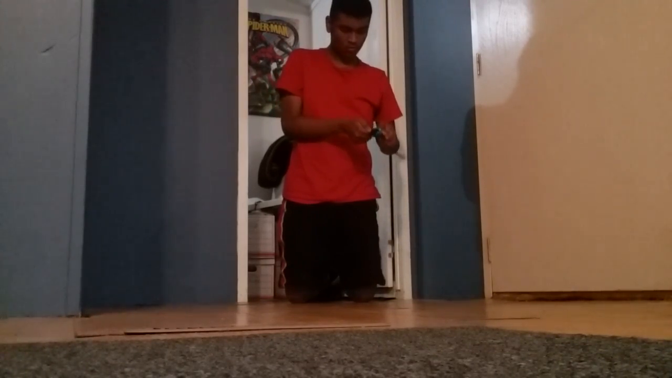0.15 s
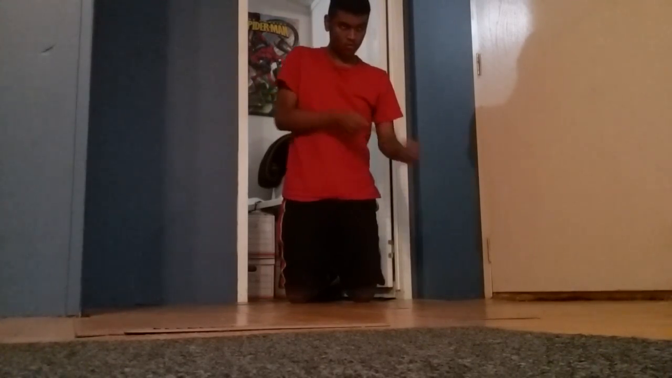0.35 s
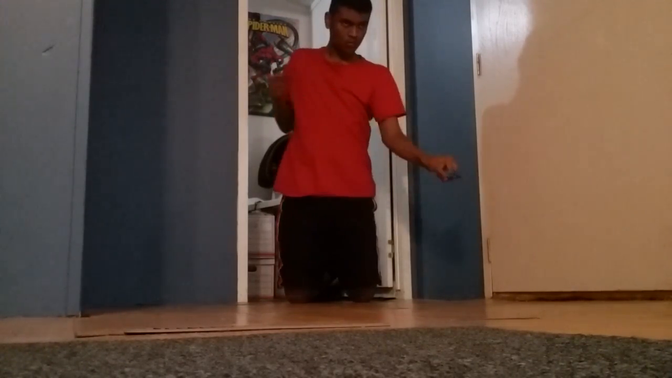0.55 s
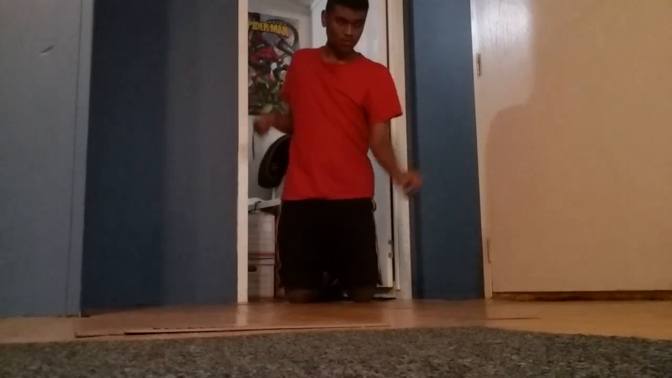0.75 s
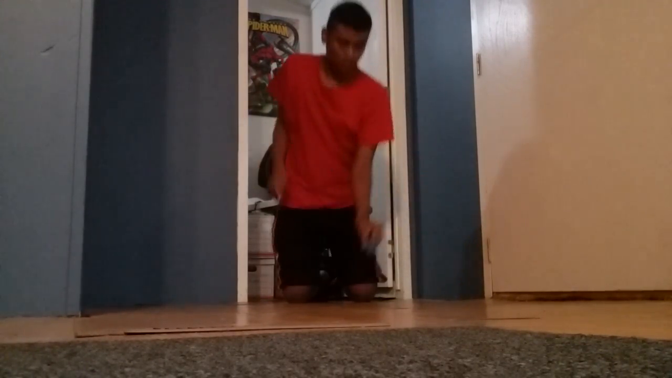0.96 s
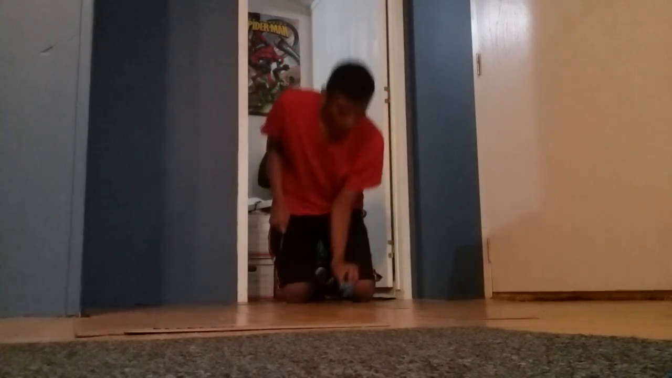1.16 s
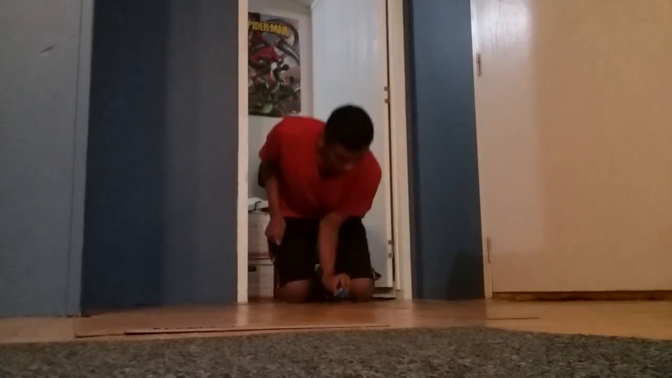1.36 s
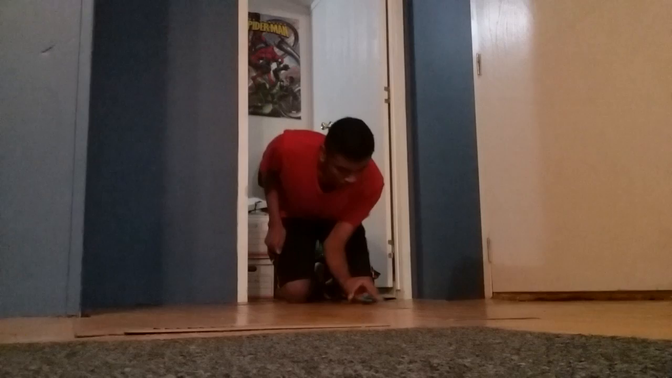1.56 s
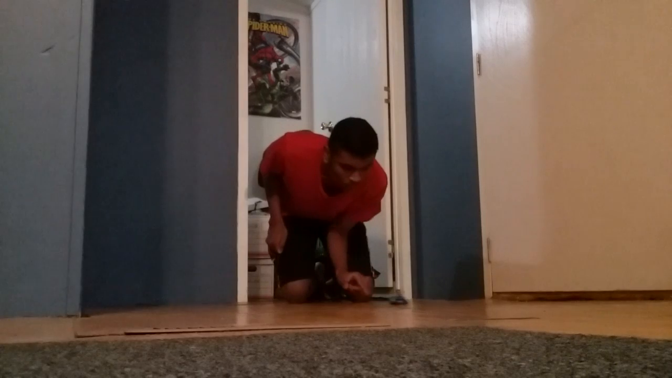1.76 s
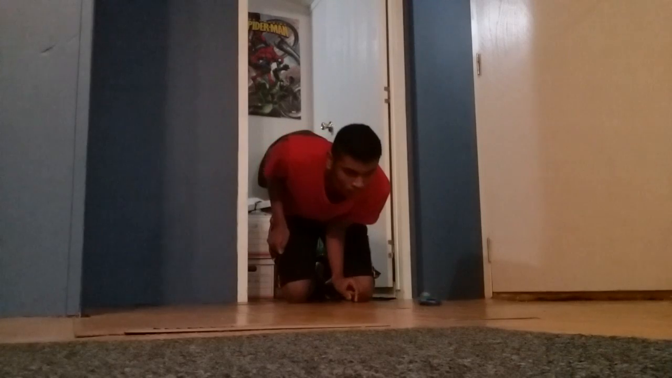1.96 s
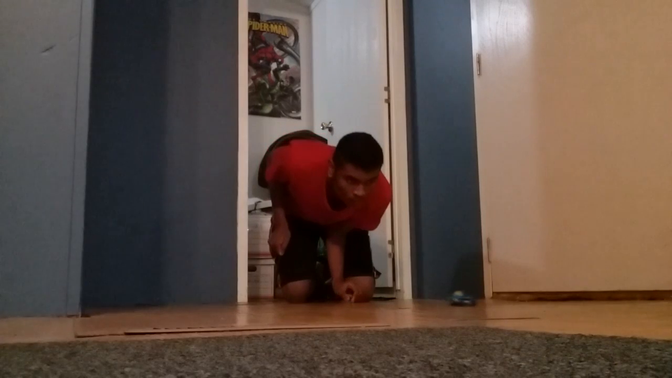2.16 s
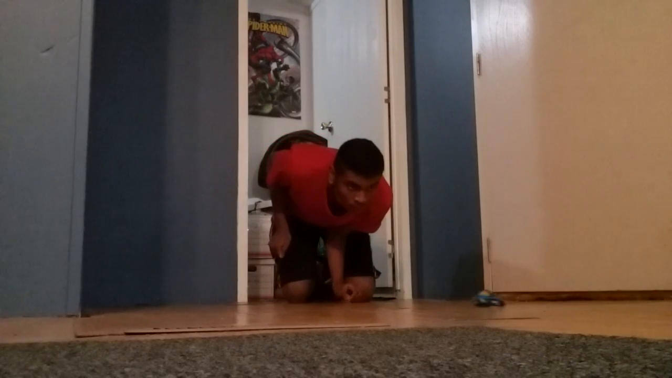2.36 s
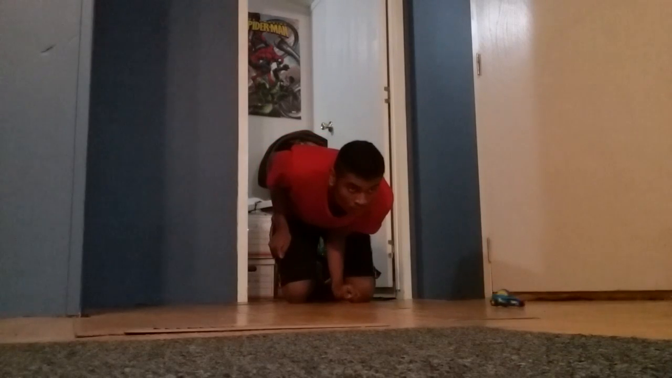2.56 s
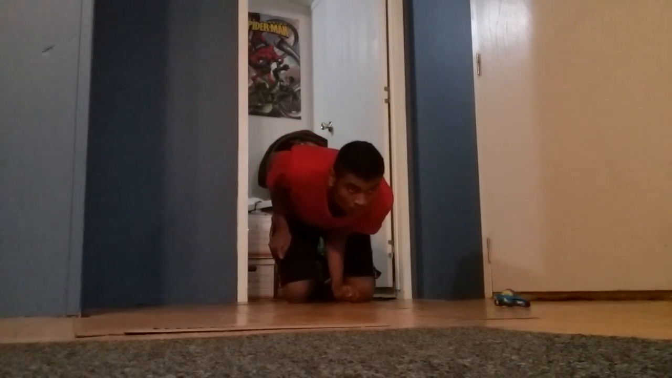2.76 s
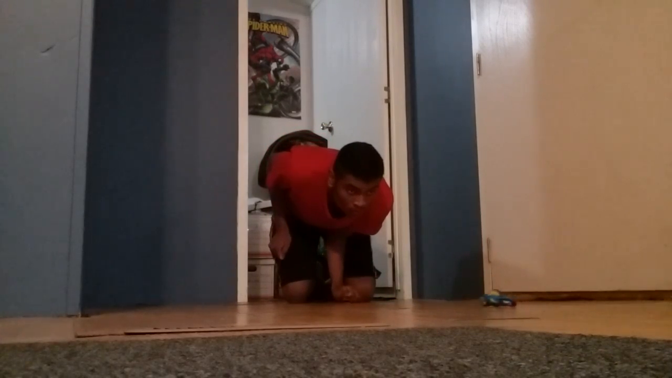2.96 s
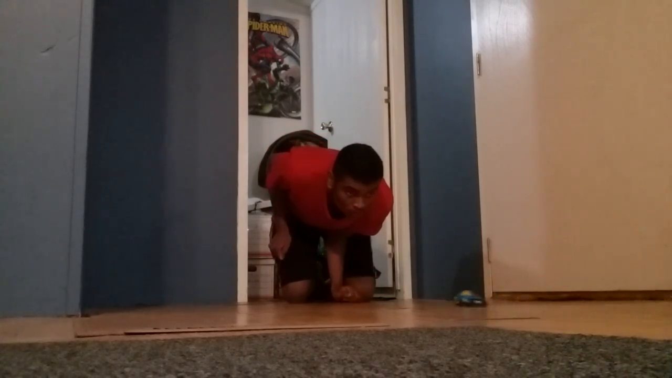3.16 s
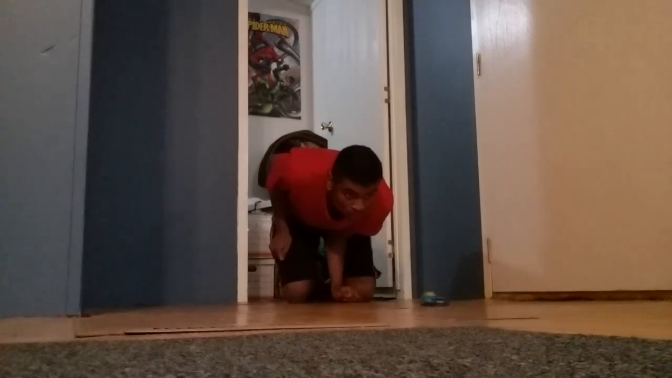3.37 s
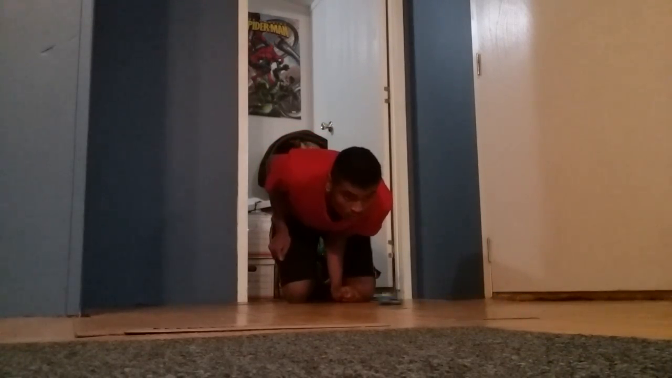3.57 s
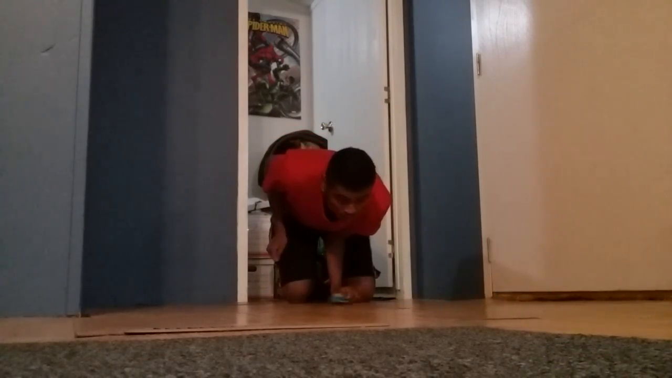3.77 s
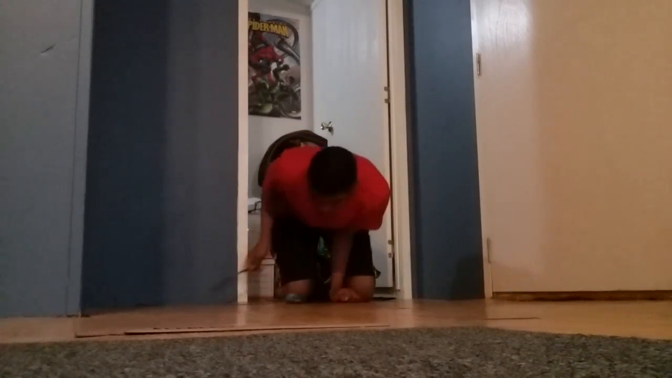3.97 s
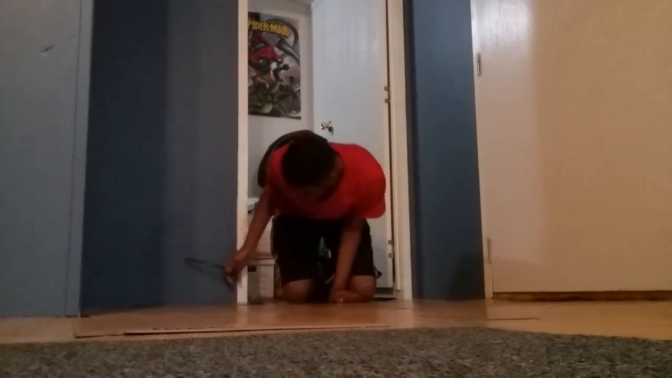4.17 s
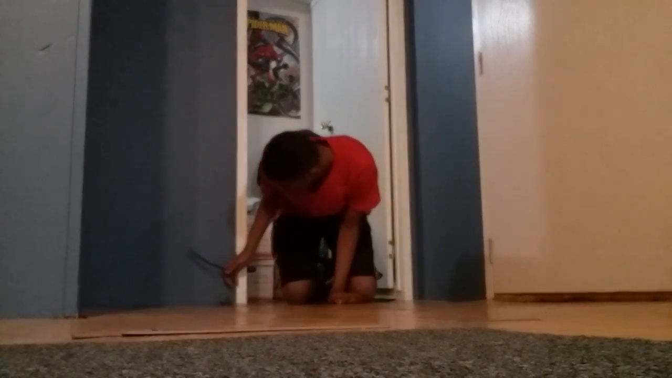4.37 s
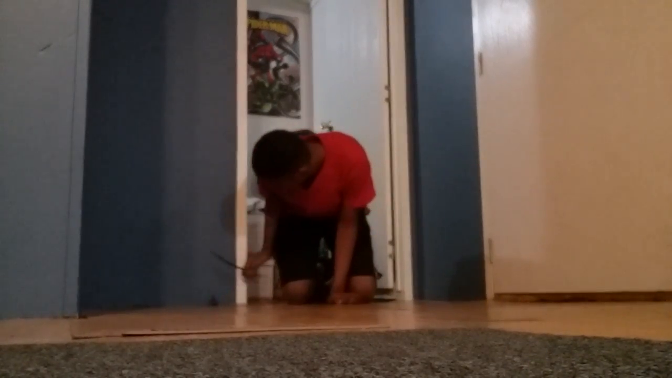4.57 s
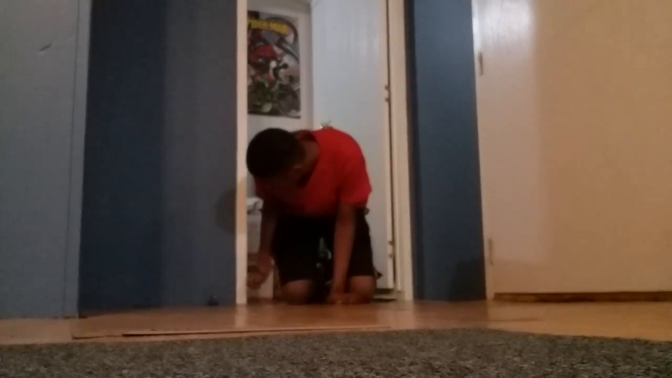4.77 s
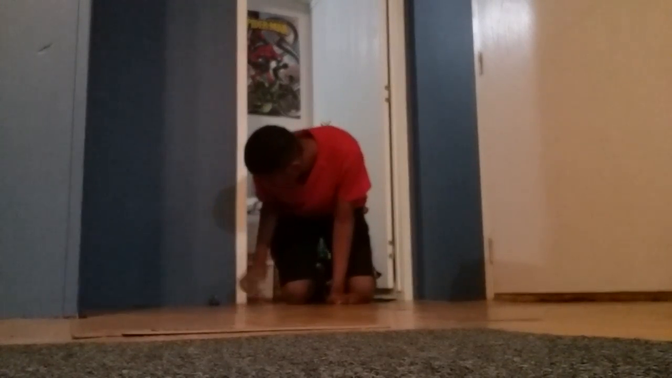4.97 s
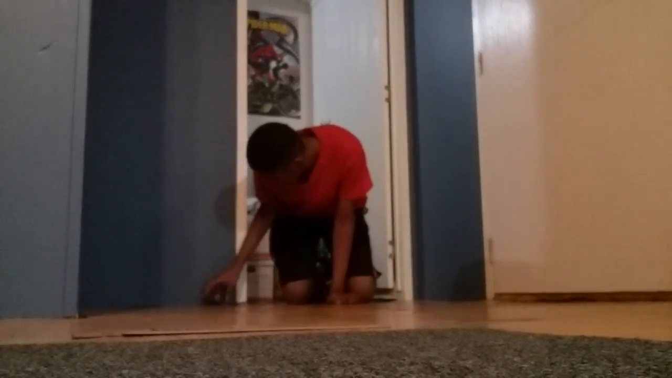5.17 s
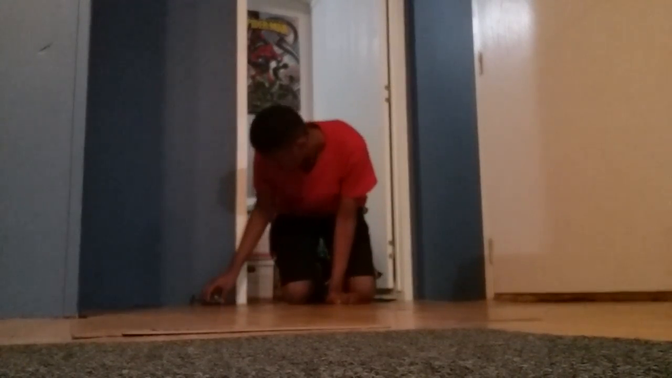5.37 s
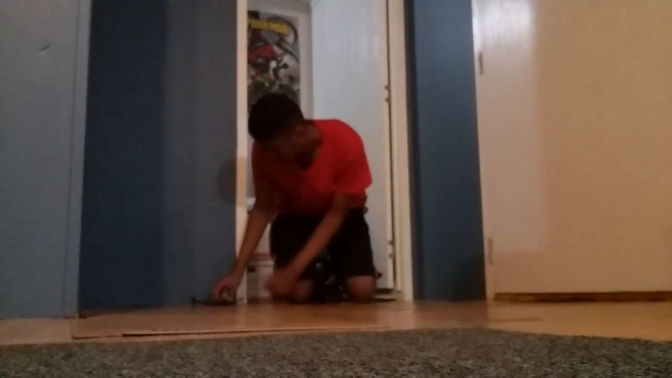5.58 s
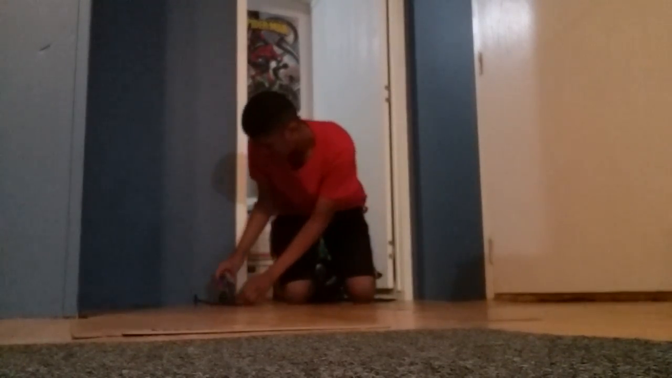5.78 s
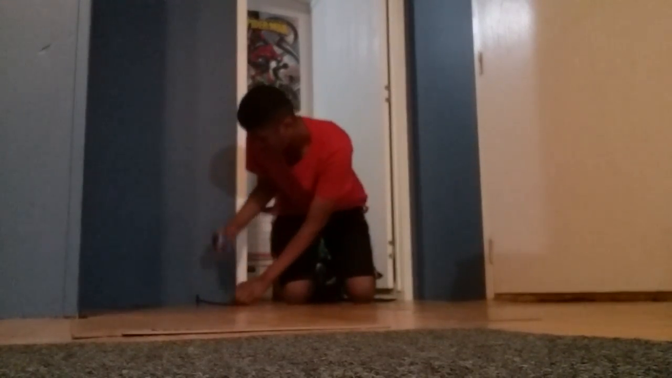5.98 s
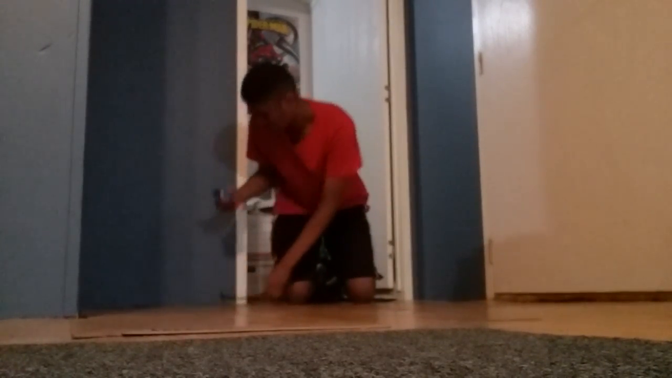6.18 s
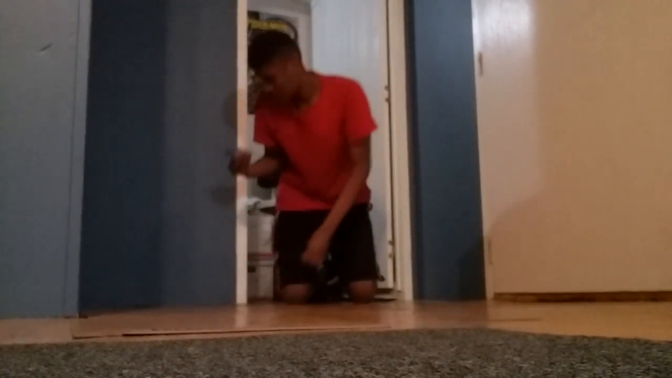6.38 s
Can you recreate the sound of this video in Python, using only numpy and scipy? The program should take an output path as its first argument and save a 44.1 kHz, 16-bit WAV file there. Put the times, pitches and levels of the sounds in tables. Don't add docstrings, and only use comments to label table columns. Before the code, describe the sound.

In a small hallway, a rip-cord toy gives a short toothed zip, then near quiet with a faint board groan. It clacks onto the wooden floor and whirs off loudly, plastic shell rattling and ticking, boards booming. It slows and thins, then thuds into a door that shudders. After a pause, a hand taps, scrapes and lifts it. The microphone is low on the floor, with faint room hum.

```python
import sys
import numpy as np
from scipy import signal
from scipy.fft import rfft, irfft, next_fast_len
from scipy.io import wavfile
from scipy.ndimage import uniform_filter1d

SR = 44100
rng = np.random.default_rng(int(sys.argv[2]) if len(sys.argv) > 2 else 0)


def inscribe(sig):
    pcm = np.round(np.clip(np.atleast_2d(sig).T, -1, 1) * 32767)
    wavfile.write(sys.argv[1], SR, pcm.astype(np.int16))


def elevation(decibels):
    levels = np.asarray(decibels, float)
    return 10 ** (levels / 20)


N = 284214

# centre_hz, width_hz, level_db
SHELL_MODES = [(1990, 410, -1.5), (2897, 610, 0.5), (3430, 560, 5), (4800, 870, -7), (5404, 940, -8),
               (6800, 250, -9), (8030, 430, -21.5), (10960, 410, -30)]
# centre_hz, width_hz, level_db
PLANK_MODES = [(634, 340, 10), (737, 300, 13.5), (1249, 440, 0.5), (1795, 220, -7)]
# start_s, level_db
DOOR_BLOWS = [
    (4.5536, -15),
    (4.5614, -12.5),
    (4.5685, -18),
    (4.797, -38),
]


def rms_one(x):
    return x / np.sqrt(np.mean(x ** 2) + 1e-20)


def evened(x, span_s):
    return x / np.sqrt(uniform_filter1d(x * x, int(span_s * SR)) + 1e-12)


def low_pass(x, order, cutoff_hz):
    return signal.sosfilt(signal.butter(order, cutoff_hz, fs=SR, output="sos"), x)


def high_pass(x, order, cutoff_hz):
    return signal.sosfilt(signal.butter(order, cutoff_hz, "high", fs=SR, output="sos"), x)


def dull(x):
    return low_pass(x, 2, 1500)


def in_time(rows):
    s, *columns = np.transpose(rows)
    t = np.arange(N) / SR
    gate = np.interp(t, [s[0] - .002, s[0], s[-1], s[-1] + .01], [0, 1, 1, 0])
    return [gate] + [np.interp(t, s, c) for c in columns]


def swell(s, db, rise_s, hold_s, fall_s):
    t = np.arange(N) / SR - s
    steps = np.maximum(np.maximum(-t / rise_s, (t - hold_s) / fall_s), 0)
    return elevation(db - 20 * steps)


def swells(rows):
    return sum(swell(*row) for row in rows)


def drift(rate_hz):
    knots = rng.standard_normal(2000)
    return np.interp(np.arange(N) / SR * rate_hz * 2, np.arange(2000), knots) * 1.2


def colour(x, spectrum):
    size = next_fast_len(N)
    hz, db = np.transpose(spectrum)
    f = np.maximum(np.arange(size // 2 + 1) * SR / size, 1)
    gain = elevation(np.interp(np.log(f), np.log(hz), db))
    return rms_one(irfft(rfft(x, size) * gain, size)[:N])


def poles(hz, width_hz):
    r = np.exp(-np.pi * width_hz / SR)
    return (1 - r * r) / 2 * np.array([1, 0, -1]), [1, -2 * r * np.cos(2 * np.pi * hz / SR), r * r]


def body(x, modes):
    out = 0
    for k, (hz, width_hz, db) in enumerate(modes):
        out = out + (-1) ** k * elevation(db) * signal.lfilter(*poles(hz, width_hz), x + 1e-18)
    return out


def steep(x, modes):
    return rms_one(body(body(x, modes), modes))


def gliding(x, centre_hz, width_hz):
    out, state = np.zeros(N), np.zeros(2)
    for i in range(0, N, 256):
        out[i:i + 256], state = signal.lfilter(*poles(centre_hz[i], width_hz), x[i:i + 256], zi=state)
    return out


def grains(per_s, spread_db):
    sizes = elevation(spread_db * np.minimum(rng.exponential(1, N), 5)) * rng.choice([-1, 1], N)
    return rms_one(sizes * (rng.random(N) < per_s / SR))


def burst(times, dbs, length_s, rise_s=0.00018):
    out, t = np.zeros(N), np.arange(2000) / SR
    envelope = np.exp(-t / length_s) * (1 - np.exp(-t / rise_s))
    for s, db, noise in zip(times, dbs, rng.standard_normal((len(times), 2000))):
        i = round(s * SR)
        out[i:i + 2000] += elevation(db) * noise * envelope
    return out


def room_tone():
    # freq_hz, level_db per Hz
    air = [(18, -28), (30, -9), (100, -5.5), (220, -12), (391, -13), (1450, -16.5), (3260, -27),
           (15700, -25)]
    # centre_hz, width_hz, level_db
    machinery = [(60, 15, -82), (157.7, 13, -92.5), (320.8, 10.3, -78.5)]
    tone_db = -67.5
    out = elevation(tone_db - 4 + 0.24 * drift(1.6)) * colour(rng.standard_normal(N), air)
    for hz, width_hz, db in machinery:
        hum = body(rng.standard_normal(N), [(hz, width_hz, 0)])
        out = out + elevation(db) * evened(hum, .2)
    return out


def plastic_contacts(once):
    return grains(2500, 3.34) * once + elevation(-5.0) * rng.standard_normal(N)


def friction_hiss():
    # freq_hz, level_db per Hz
    spectrum = [(880, -41), (1500, -1), (2010, -4), (3480, -6), (6500, -24.5), (7380, -29), (15500, -35.5)]
    return colour(grains(9000, 3.2), spectrum[:1] + [(5000, -32.0), (7000, -27.5)] + spectrum[-3:])


def wheel_in_hand(contacts, hiss):
    # centre_hz, width_hz, level_db
    axle_modes = [(1810, 640, -10.5), (3430, 256, -4.5), (3750, 196, -9.5)]
    # centre_hz, width_hz, level_db
    teeth_modes = [(4010, 330, -2.5), (4505, 140, 1.5), (5200, 740, -13.5)]
    # time_s, effort_db, axle_and_hiss_vs_teeth_db
    pull = [(0.33, -84, 0), (0.446, -57.5, 0), (0.46, -36.5, -4.5), (0.48, -50.5, 3), (0.548, -57, -5),
            (0.585, -49.5, -10), (0.666, -52.5, -13.5), (0.688, -72.5, -2), (0.75, -73.5, -3)]
    # start_s, level_db, rise_s, hold_s, fall_s
    idle = [
        (0, -72.5, .01, 0.0016, 0.1),
        (.75, -80.5, .02, 0.858, 0.053),
        (.78, -70.5, 0.03, 0, .09),
        (0.903, -81, .1, 0.052, 0.048),
        (1.04, -79.5, 0.073, 0.016, 0.082),
        (1.3, -78.5, 0.12, 0, .1),
        (1.59, -81, 0.055, 0, .05),
        (1.656, -63, 0.065, 0, 0.0112),
    ]
    axle = rms_one(signal.lfilter([1, -.95], 1, body(contacts, axle_modes)))
    axle = elevation(2.0 * drift(45)) * axle
    teeth = rms_one(body(body(contacts[::-1], teeth_modes), [(4330, 4250, 0)]))
    gate, effort_db, share_db = in_time(pull)
    pulled = elevation(-1.5) * teeth + elevation(share_db) * (axle + elevation(-2) * hiss)
    idling = axle + elevation(-5 + 2.5 * drift(12.1)) * teeth + elevation(-4) * hiss
    return gate * elevation(effort_db) * pulled + swells(idle) * idling


def hand():
    # start_s, level_db, rise_s, hold_s, fall_s
    kneel = [
        (.4, -67, .02, 0.26, .016),
        (1.297, -73, .1, 0.1, .06),
        (1.655, -69, 0.113, 0, .01),
        (5.049, -64, .003, 0.019, 0.069),
        (5.154, -59, .014, 0.0011, 0.15),
        (5.416, -75, .14, 0, .035),
        (5.704, -69, .6, 0, .065),
        (6.168, -73.5, .27, 0.0048, .035),
        (6.206, -73.5, .022, 0, 0.166),
    ]
    # start_s, level_db, rise_s, hold_s, fall_s
    drags = [
        (.444, -63, 0.077, .014, .047),
        (.6, -64.5, .03, 0, 0.074),
        (5.152, -47, 0.0043, 0.0013, 0.04),
        (5.194, -50, 0.016, 0, 0.0437),
        (5.25, -61.5, 0.049, 0.031, 0.09),
        (5.45, -69.5, .2, 0.00017, 0.19),
        (5.545, -64, 0.078, 0, 0.16),
        (5.699, -59, .05, 0.0065, 0.064),
        (6.134, -65, .05, 0.025, .06),
        (6.212, -59.5, .01, 0.0036, .09),
    ]
    # start_s, plank_peak_db, middle_db, bright_db
    taps = [(5.054, -45, -47.5, -43.5), (5.062, -40, -49.5, -48.5), (5.15, -46, -50, -63),
            (5.161, -38.5, -51.5, -64.5), (5.182, -41.5, -51, -65), (5.194, -44, -54, -62),
            (5.264, -47, -58, -74), (5.543, -64, -87, -78), (5.665, -52.5, -69, -79.5),
            (5.691, -54, -65.5, -70.5), (5.723, -41, -81, -69.5), (5.762, -63, -79, -81),
            (6.131, -52, -62, -90), (6.165, -56, -70, -90), (6.212, -48, -60, -88.5),
            (6.24, -58, -80, -77.5)]
    s, plank_db, middle_db, bright_db = np.transpose(taps)
    plank = dull(body(burst(s, plank_db + 5.0, 0.0055), PLANK_MODES))
    clack = burst(s, middle_db + 7, 0.009, rise_s=0.00076)
    clack = body(clack, [(1774, 620, 5), (2704, 1170, -1.5), (3910, 1750, -6.5)])
    tick = body(burst(s, bright_db + 4.5, 0.00643, rise_s=0.0016), [(8600, 17000, 0.00023)])
    scuff = rms_one(dull(body(grains(1200, 0.97), PLANK_MODES)))
    scuff = scuff + elevation(-18.0) * rms_one(body(grains(3000, 2.4), SHELL_MODES[:3]))
    give = body(rng.standard_normal(N), [(158.7, 51, 7), (272, 43, 7), (326, 33, 11), (464, 160, -0.5)])
    return plank + clack + tick + swells(drags) * scuff + swells(kneel) * rms_one(give)


def jolts():
    # start_s, shell_peak_db, plank_db
    joints = [(0.4564, -37.5, -42), (1.6651, -20, -38.5), (1.6774, -23, -21.5), (1.7044, -25, -20),
              (2.149, -36.5, -20), (2.3106, -27, -21), (2.6504, -25, -36.5), (2.7586, -30, -21),
              (2.8764, -36, -18), (2.9183, -41, -47), (3.3348, -40, -22), (3.7714, -34, -17),
              (4.2537, -38, -25), (4.3434, -37, -23), (4.3814, -30, -38.5), (4.4074, -25, -34),
              (4.4434, -26.5, -46)]
    s, shell_db, plank_db = np.transpose(joints)
    soft = low_pass(burst(s, shell_db + 5.0, 0.0023), 2, 5500)
    return body(soft, SHELL_MODES) + body(burst(s, plank_db + 1, 0.004), PLANK_MODES)


def creak():
    # time_s, pitch_hz, level_db
    groan = [
        (1.2, 340, -84),
        (1.32, 330, -73),
        (1.42, 285, -71),
        (1.55, 270, -75),
        (1.65, 260, -78),
    ]
    gate, pitch_hz, level_db = in_time(groan)
    tone = np.sin(2 * np.pi * np.cumsum(pitch_hz + 8 * drift(20)) / SR)
    return gate * elevation(level_db + 3 + 2.0 * drift(15)) * tone


def tread():
    # time_s, turns_per_s
    spin = [(1.7, 82.9), (2.248, 68.8), (2.322, 66.2), (2.452, 63.9), (2.518, 61.3), (2.612, 59.0),
            (2.858, 50.5), (2.94, 46.4), (3.1, 42.5)]
    # time_s, turns_per_s
    coast = [(3.3, 38), (3.8, 32), (4.6, 24)]
    # time_s, share (0-1)
    repeat = [(1.66, .55), (1.85, .58), (2.35, .64), (2.9, .54), (3.2, .3), (4.6, .1)]
    lugs_db = [0, 0, 0, 0, 0, 2, 1, 2, 2, 2, 2, 2, 2, 0, 3, 5, 3, 0, -1.5, -1]
    speed = spin + coast
    turns = np.cumsum(in_time(speed)[1]) / SR
    lug_amp = elevation(1.0 * rng.standard_normal(129) + np.pad(lugs_db, (1, 108)))
    shape = rms_one(irfft(np.exp(2j * np.pi * rng.random(129)) * lug_amp, 256))
    grit = rms_one(signal.lfilter([1], [1, -.35], rng.standard_normal((600, 256)), axis=0))
    turn_start = np.minimum(np.searchsorted(turns, np.arange(600)), N - 1)
    share = in_time(repeat)[1][turn_start, None]
    bumps = share * shape + np.sqrt(1 - share ** 2) * grit
    once = 1 + .3 * np.cos(2 * np.pi * turns)
    passing = np.interp(turns * 256, np.arange(bumps.size), bumps.ravel())
    slowing = np.sqrt(in_time([(s, 60 / n) for s, n in speed])[1])
    return (.5 + .5 * once) * passing / slowing, once


def rolling(bumps):
    # time_s, tread_pressure_db, boards_vs_whir_db, whir_hz
    roll = [(1.67, -33, -8, 1066), (1.87, -35, -8.5, 960), (2.17, -35.5, -8.5, 1060), (2.36, -31, -15, 930),
            (2.43, -31.5, -11, 860), (2.55, -33.5, -10.5, 766.6), (2.62, -32, -8, 804),
            (2.89, -36, -4, 650), (3.13, -36, -11, 642), (3.23, -38, -11, 650), (3.43, -36.5, -12.5, 800),
            (3.57, -45.5, -4.5, 879.4), (3.64, -40, -7, 867.4), (3.8, -44, -4.5, 860),
            (3.93, -44.5, -1.5, 799.8), (4.15, -42.5, -9.5, 729), (4.3, -41.5, -2.5, 742),
            (4.54, -42, -11, 749.8)]
    # centre_hz, width_hz, level_db
    floor_modes = [(650, 41, 0.5), (733, 25, 0.5), (850.9, 35, -0.5), (1053.2, 27, 2.5), (1114, 33, 0),
                   (1282, 60, -4)]
    # freq_hz, level_db per Hz
    boom = [(110, -42.5), (180, -28), (209, 0), (248, -4.5), (281, 3), (520, -1.5), (680, -10),
            (1140, -120)]
    # freq_hz, level_db per Hz
    rumble = [(24, -39), (45, -19), (92, -5.5), (124, -3), (151, -4), (170, -0.5), (220, -40), (370, -120)]
    # start_s, level_db
    crossings = [(1.68, -43.5), (1.78, -54.5), (1.9, -55), (2.05, -59.5), (2.3, -59.5), (2.85, -59),
                 (3.1, -60), (3.28, -64), (3.53, -62), (3.72, -53.5), (3.85, -64), (3.99, -52.5),
                 (4.29, -55), (4.4, -59), (4.54, -61.5)]
    gate, whir_db, hollow_db, centre_hz = in_time(roll)
    narrow = rms_one(gliding(gliding(bumps, centre_hz, 480.7), centre_hz, 800))
    narrow = narrow + elevation(-11) * rms_one(body(narrow, floor_modes))
    whir = evened(narrow, 0.092) + elevation(-24.5) * rms_one(body(bumps, PLANK_MODES))
    whir = elevation(whir_db - 2 + 1.7 * drift(14)) * whir
    boards = elevation(whir_db + hollow_db) * evened(colour(bumps, boom), 0.07)
    hallway = rms_one(body(bumps[::-1], [(58, 6, 0)]))
    between_db = -65.5
    crossing = elevation(between_db) + sum(swell(s, db, 0.11, 0, 0.11) for s, db in crossings)
    joists = crossing * evened(colour(bumps, rumble) + 0.23 * hallway, 0.12)
    return gate * (whir + boards + joists)


def shell_rattle(contacts, hiss):
    # time_s, level_db, loudest_resonance_hz
    looseness = [(1.667, -43, 3500), (1.9, -47.5, 2600), (2.05, -45, 2570), (2.2, -45.5, 2500),
                 (2.3, -45, 3300), (2.45, -47, 2295), (2.56, -48, 2600), (2.66, -46.5, 3449),
                 (2.76, -45.5, 2900), (2.85, -47.5, 2800), (2.97, -46.5, 2700), (3.1, -47.5, 2300),
                 (3.25, -51, 2600), (3.4, -55.5, 3257), (3.56, -56.5, 3180), (3.7, -54.5, 3300),
                 (3.9, -57, 3102), (4.05, -53, 3302), (4.2, -53.5, 3250), (4.6, -48.5, 3400)]
    # freq_hz, level_db per Hz
    chatter_spectrum = [(1000, -29), (1700, 1), (2010, 2.5), (2900, -5), (4360, -4), (6480, -14),
                        (7000, -25.5), (11000, -70)]
    # centre_hz, width_hz, level_db
    rim_modes = [(6480, 750, -23.5), (8500, 1100, -28.5), (11400, 1400, -36)]
    # start_s, rattle_db, hiss_db, fall_s per 20 dB
    flares = [
        (1.68, -39, -43.5, 0.19),
        (2.6, -56, -52, 0.03),
        (3.73, -58, -63, 0.17),
        (3.82, -62.5, -64.5, 0.09),
        (4.0, -57, -64, 0.3),
        (4.18, -52, -62, 0.16),
        (4.25, -43.5, -58.5, 0.1),
        (4.41, -54, -62, 1),
        (4.52, -53, -57, .15),
        (4.565, -44.5, -51, 0.1),
    ]
    # start_s, level_db, rise_s, hold_s, fall_s
    skid = (4.5, -66, 0.5, 0.29, 0.09)
    # start_s, level_db, rise_s, hold_s, fall_s
    rasps = [(2.22, -58, .1, 0.039, 0.11), (2.473, -59, .15, .05, .1), (2.6, -55, .05, 0, 0.045),
             (2.76, -55, 0.055, 0.0046, 0.055), (2.86, -59, .03, 0, .04), (3.02, -62, .1, 0.14, 0.081),
             (3.62, -65, 0.071, 0.0031, .2), (4.007, -66, .05, 0.015, .1)]
    # centre_hz, width_hz, level_db
    rasp_mode = [(4170, 1000, 0)]
    # start_s, level_db, rise_s, hold_s, fall_s
    landing = (1.667, -36, .002, .015, .03)
    # centre_hz, width_hz, level_db
    landing_mode = [(3550, 300, 0)]
    land_s, end_s, rest_s, flare_rise_s = looseness[0][0], 4.66, 0.13, .03
    _, loose_db, centre_hz = in_time(looseness)
    moving = swell(land_s, 0, .001, end_s - land_s, rest_s)
    rattle_flares = sum(swell(s, db, flare_rise_s, 0, fall_s) for s, db, _, fall_s in flares)
    hiss_flares = sum(swell(s, db, flare_rise_s, 0, fall_s) for s, _, db, fall_s in flares)
    rattle = np.hypot(elevation(loose_db), rattle_flares)
    slip = np.hypot(elevation(-62 + 0.47 * (loose_db + 46)), hiss_flares)
    wander = elevation(1.2 * drift(9)) * rms_one(gliding(contacts, centre_hz, 600))
    clatter = elevation(5 * drift(25)) * rms_one(body(contacts[::-1], SHELL_MODES[1:4]))
    chatter = rms_one(colour(contacts, chatter_spectrum) + 0.6 * wander + 0.24 * clatter)
    for hz, width_hz, db in rim_modes:
        chatter = chatter + elevation(db) * steep(contacts, [(hz, width_hz, 0)])
    out = moving * (rattle * elevation(1.2 * drift(20)) * chatter + slip * hiss) + swell(*skid) * hiss
    out = out + swells(rasps) * steep(contacts, rasp_mode)
    return out + swell(*landing) * steep(contacts, landing_mode)


def snicks():
    # start_s, peak_db
    contacts = [(2.1952, -44), (2.273, -41), (2.499, -45), (2.5978, -42), (2.6537, -42), (2.7415, -44),
                (2.7604, -42), (2.7804, -43), (2.8971, -49), (2.9176, -46), (2.9415, -45), (2.9759, -47),
                (3.1396, -45), (3.168, -44), (3.2338, -50), (3.2633, -50), (3.3356, -50), (3.4853, -52),
                (3.5855, -54), (3.6075, -53), (3.6205, -49), (3.6983, -49), (3.7247, -52), (3.9357, -53),
                (3.9936, -48), (4.0984, -49), (4.1632, -46), (4.252, -39), (4.3827, -44)]
    s, db = np.transpose(contacts)
    modes = [(4300, 1500, 3), (5400, 900, 4), (6450, 600, 3), (7400, 700, -40), (8550, 800, -1)]
    return body(burst(s, db, .003), modes)


def ticks():
    # start_s, peak_db, ring_hz
    rings = [(2.4151, -27, 1890), (2.5147, -33, 2260), (2.5473, -31, 2100), (2.667, -29, 3580),
             (2.8351, -35, 2899), (2.9617, -31, 2470), (3.0297, -33, 2610), (3.0532, -32, 1823),
             (3.2554, -30, 1880), (3.4676, -41, 2798), (3.5825, -42, 1820), (3.6194, -35, 4240),
             (3.6693, -41, 1920), (3.7246, -40, 3930), (3.81, -41, 3570), (3.9551, -39, 3200),
             (4.0534, -42, 3377), (4.2528, -33, 3320)]
    out = np.zeros(N)
    for start_s, db, hz in rings:
        i = round(start_s * SR)
        out[i:i + 800] += elevation(db + 19) * body(np.arange(800) == 0, [(hz, 410, 0)])
    return out


def door_cracks():
    # start_s, peak_db
    cracks = [
        (4.5351, -27),
        (4.554, -22),
        (4.5603, -24.5),
    ]
    edge = burst(*np.transpose(cracks), .002) * elevation(4)
    after_blow = np.arange(N) >= DOOR_BLOWS[0][0] * SR
    snap = body(edge * after_blow, [(8000, 3000, 0), (11200, 900, 3)])
    return body(edge, SHELL_MODES) + elevation(-15.5) * snap


def thud():
    # centre_hz, width_hz, level_db
    slap_modes = [(262, 83, 4), (400, 80, -3), (545, 53, -4)]
    # centre_hz, width_hz, level_db
    door_modes = [(150.2, 12, -6), (170, 12, -0.5), (196, 15, -2), (218, 20, -3), (241, 20, -1),
                  (260.7, 14, 8.5), (272, 14, 1.5), (297.6, 20, -2.5), (339, 22, -2.5), (359, 25, 1.5),
                  (404.4, 20, 3.5), (462, 23, -6), (484, 30, -2.5), (549, 18, -2)]
    # time_s, level_db
    shudder = [(4.556, -14), (4.572, -17), (4.59, -15), (4.608, -15), (4.66, -23), (4.774, -42),
               (4.794, -42.5), (4.92, -93)]
    # freq_hz, level_db per Hz
    frame_spectrum = [(440, -31), (750, 0), (904, -5.5), (1080, -16.5), (1160, -5.5), (1900, -26),
                      (2470, -49.5), (4180, -120)]
    # start_s, level_db, rise_s, hold_s, fall_s
    knocks = [
        (4.557, -19.5, .002, 0.002, .03),
        (4.583, -19.5, .035, 0.00045, 0.028),
        (4.668, -33.5, .08, 0, .09),
        (4.77, -44.5, .15, 0, 0.07),
    ]
    push = np.zeros(N)
    for s, db in DOOR_BLOWS:
        push[round(s * SR)] = -elevation(db + 41.5)
    struck = body(signal.lfilter(np.hanning(50) / 25, 1, push), slap_modes)
    noise = rng.standard_normal(N)
    t = np.arange(N) / SR - DOOR_BLOWS[0][0]
    shaken, free = 0, 0
    for k, (hz, width_hz, db) in enumerate(door_modes):
        shaken = shaken + elevation(db) * evened(body(noise, [(hz, width_hz, 0)]), .06)
        free = free + (-1) ** k * elevation(db) * np.sin(2 * np.pi * hz * t)
    free_share = 0.67
    panel = free_share * np.sqrt(2) * free + np.sqrt(1 - free_share ** 2) * shaken
    panel = low_pass(evened(panel, .04), 4, 850)
    frame = colour(rng.standard_normal(N), frame_spectrum)
    gate, panel_db = in_time(shudder)
    out = struck + gate * (elevation(panel_db - 3) * panel + elevation(-7) * swells(knocks) * frame)
    return high_pass(out, 6, 143)


def drone():
    # start_s, level_db, rise_s, hold_s, fall_s
    surges = [
        (5.62, -74, .1, .05, .1),
        (5.95, -70, .15, .12, .05),
        (6.26, -72, .05, .16, .1),
    ]
    hum = np.sin(2 * np.pi * np.cumsum(326 + 3 * drift(6)) / SR)
    return swells(surges) * hum


def hall(x):
    # freq_hz, t60_s
    decay = [(100, 0.26), (400, 0.33), (1500, 0.42), (5000, 0.29), (15000, 0.19)]
    decay_hz, decay_s = np.transpose(decay)
    t, reply = np.arange(SR // 2) / SR, 0
    noise = rng.standard_normal(SR // 2)
    for low_hz in 60 * 2. ** np.arange(8):
        octave = signal.butter(2, [low_hz, 2 * low_hz], "band", fs=SR, output="sos")
        t60_s = np.interp(np.log(low_hz * np.sqrt(2)), np.log(decay_hz), decay_s)
        reply = reply + signal.sosfilt(octave, noise) * elevation(-60 * t / t60_s)
    reply = reply * np.clip((t - .003) / 0.015, 0, 1)
    return signal.fftconvolve(x, reply / np.sqrt(np.sum(reply ** 2)))[:N]


def scene():
    # landing_s, contact_lost (0-1), rise_s per 20 dB
    hops = [
        (2.5, 0.58, 0.2),
        (3.331, .8, 0.08),
        (3.769, 0.3, 0.05),
        (3.925, 0.44, 0.21),
        (4.341, 0.58, 0.03),
    ]
    bumps, once = tread()
    contacts, hiss = plastic_contacts(once), friction_hiss()
    lost = sum(share * swell(s, 0, rise_s, 0, 0.0043) for s, share, rise_s in hops)
    floor_contact = 1 - np.clip(lost, 0, 1)
    steady = wheel_in_hand(contacts, hiss) + floor_contact * rolling(bumps) + shell_rattle(contacts, hiss)
    hits = jolts() + ticks() + door_cracks()
    near, knock = hand(), thud()
    wet = elevation(-2.5) * hall(elevation(-6) * steady + hits + elevation(-6.5) * near + elevation(-9) * knock)
    dry_only = room_tone() + creak() + snicks() + drone()
    return (steady + hits + near + knock + wet + dry_only)[None]


def top_cut(x):
    return signal.sosfilt(signal.butter(12, 15840, fs=SR, output="sos"), x)


def record(dry):
    x = high_pass(dry, 4, 50)
    x = signal.sosfilt(signal.cheby2(10, 60, 16800, fs=SR, output="sos"), x)
    offset = -0.00039
    return top_cut(x + offset)


dry = scene()
out = record(dry)
inscribe(out)
```